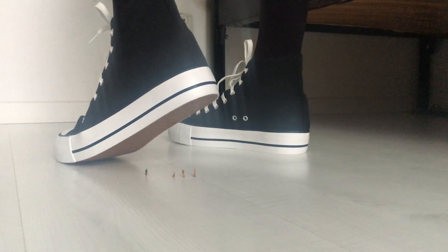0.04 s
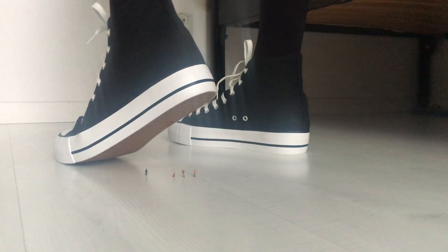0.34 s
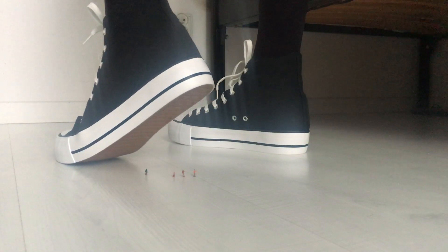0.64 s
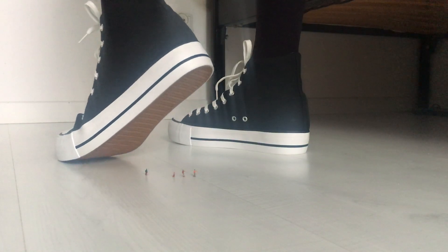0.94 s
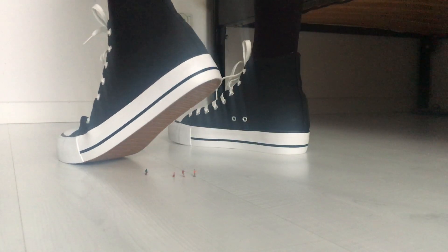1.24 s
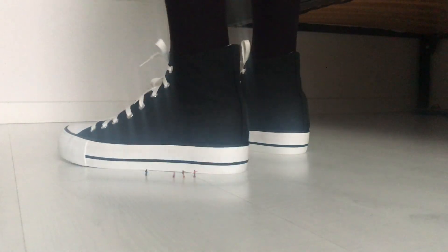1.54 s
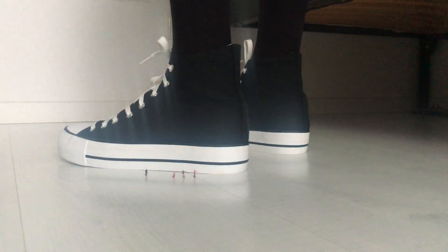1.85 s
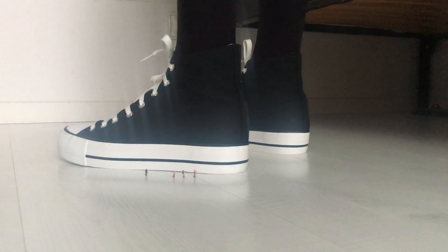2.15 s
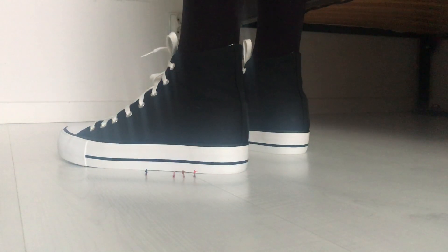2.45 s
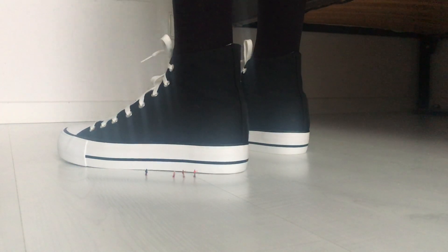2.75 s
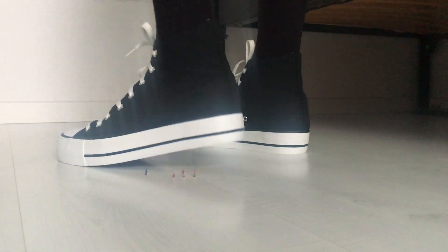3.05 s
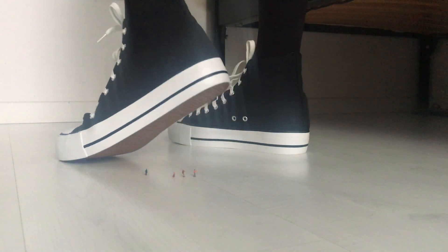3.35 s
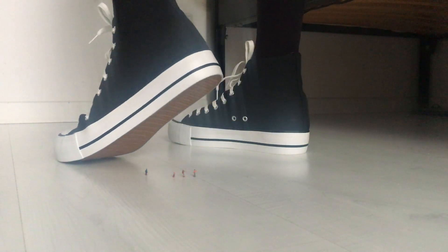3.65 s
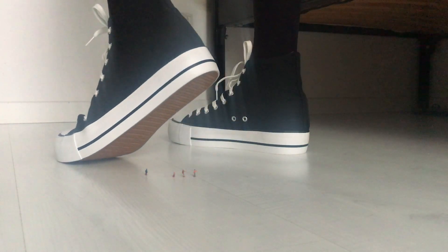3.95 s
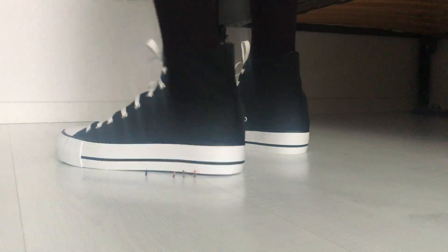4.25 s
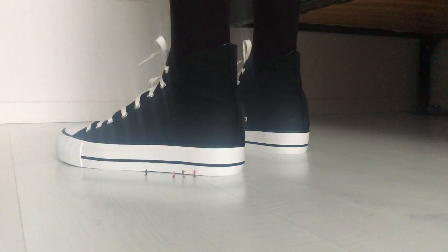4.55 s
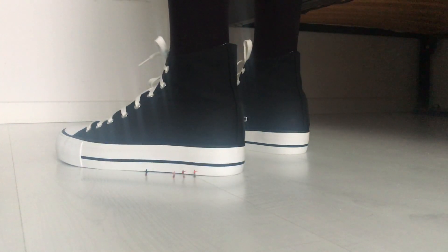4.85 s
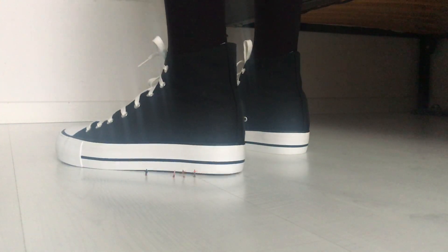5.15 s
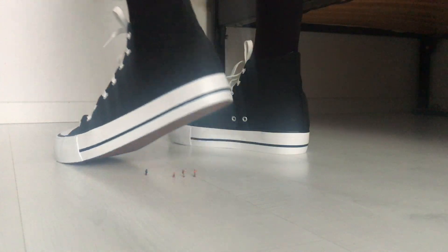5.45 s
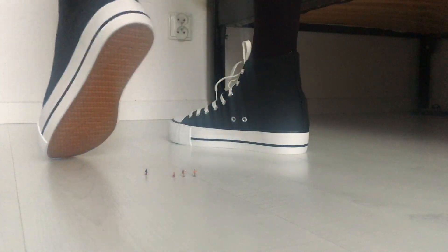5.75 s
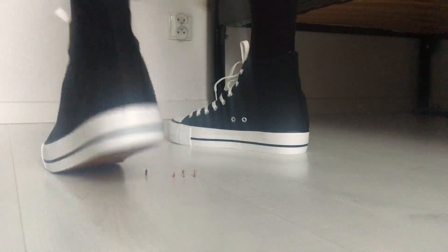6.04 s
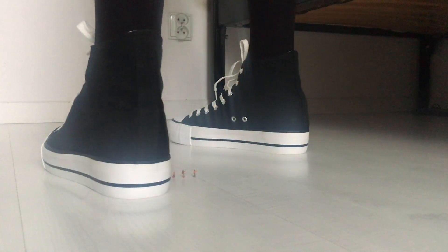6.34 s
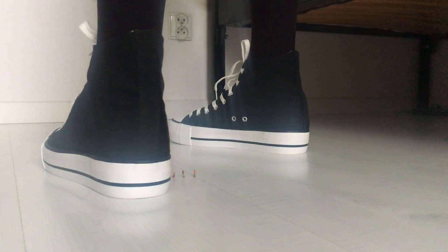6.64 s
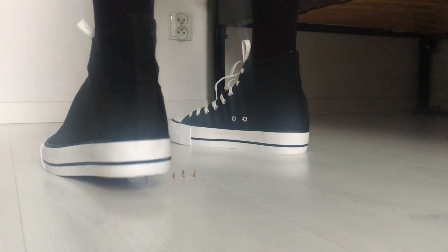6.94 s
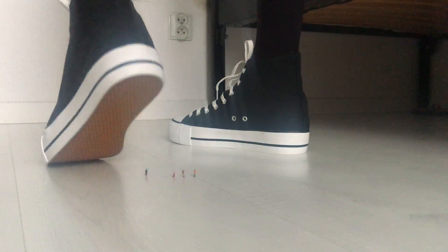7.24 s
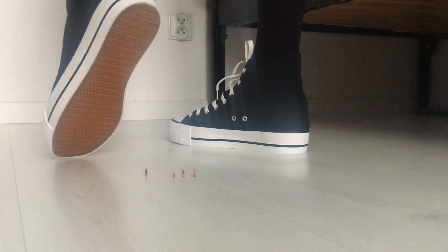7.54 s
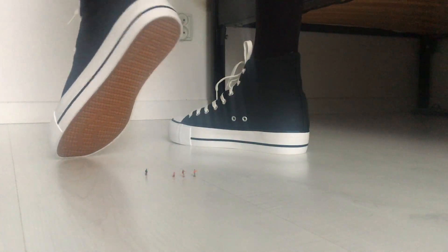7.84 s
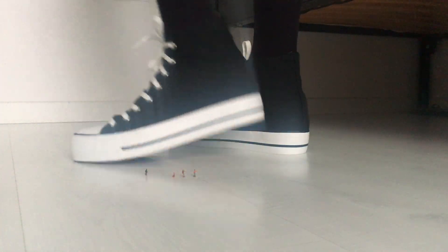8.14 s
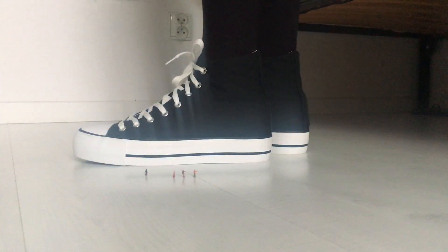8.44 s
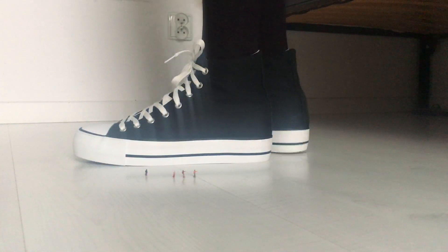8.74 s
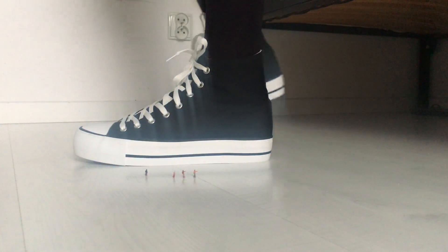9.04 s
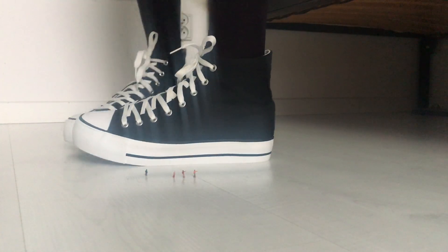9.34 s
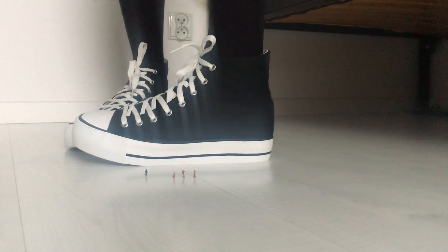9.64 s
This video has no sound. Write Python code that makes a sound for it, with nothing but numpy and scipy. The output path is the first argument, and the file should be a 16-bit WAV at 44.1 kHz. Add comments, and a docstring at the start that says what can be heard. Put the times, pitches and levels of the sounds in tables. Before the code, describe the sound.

Rubber-soled sneakers step slowly on a laminate floor in a small, quiet room. Four hollow, bassy heel thuds land a couple of seconds apart, each with a slight crackle of tread. Between them come soft bumps of shifting weight, small ticks as the sole peels away, and very faint scuffs. A few light toe touches finish it. The shoes sound close, over a faint rumble and hiss.

```python
"""Four hollow footfalls, with soft bumps, ticks and scuffs between: sneakers on a floating laminate floor.
Each impact launches a dispersive bending wave in the boards, excites the floor's damped modes
and reverberates in a small, quiet room. The rubber soles tick and scuff by stick-slip friction
as they flex and peel away. A faint rumble and hiss lie under it all."""
import sys
import numpy as np
from scipy import signal
from scipy.fft import rfft, irfft
from scipy.io import wavfile

SR = 44100
rng = np.random.default_rng(int(sys.argv[2]) if len(sys.argv) > 2 else 0)


def digitize_waveform(pressure):
    """Quantize a signal to 16-bit integers and store it at the path in sys.argv[1].

    Rows of a 2-D input are taken as channels; values are limited to [-1, 1].
    """
    field = np.atleast_2d(pressure).T
    bounded = np.clip(field, -1, 1)
    quanta = np.round(bounded * 32767).astype(np.int16)
    wavfile.write(sys.argv[1], SR, quanta)


N = 427329
SIZE = 32768   # samples in one event
AGE = np.arange(SIZE) / SR   # seconds since its onset
HZ = np.maximum(np.arange(SIZE // 2 + 1) * SR / SIZE, 1)   # frequencies of its spectrum
BASS_BAND_HZ, KNOCK_BAND_HZ, CLACK_BAND_HZ = [17, 92], [145, 283], [1200, 1800]


def from_db(db):
    """Amplitude ratio of a level in decibels."""
    return 10 ** (np.asarray(db) / 20)

def rms_one(x):
    """Normalisation to unit rms."""
    return x / np.sqrt(np.mean(x ** 2) + 1e-20)

def at_hz(rows, hz, column=1):
    """Interpolation of a table column over log frequency."""
    rows = np.array(rows)
    return np.interp(np.log(hz), np.log(rows[:, 0]), rows[:, column])

def band(x, hz, kind, order=2):
    """Butterworth filter."""
    sections = signal.butter(order, np.clip(hz, 10, .45 * SR), kind, fs=SR, output="sos")
    return signal.sosfilt(sections, x + 1e-18)

def emphasis(x, db, band_hz):
    """Boost or cut of one broad band."""
    return x + (from_db(db) - 1) * band(x, band_hz, "band", order=1)

def add(track, start_s, sound):
    """Superposition of a sound on a track."""
    start = int(round(start_s * SR))
    track[start:start + len(sound)] += sound[:len(track) - start]

def ring(hz, db, t60_s):
    """Free vibration of a damped oscillator."""
    return from_db(db - 60 * AGE / t60_s) * np.sin(2 * np.pi * hz * AGE)


# The heel lands flat: start_s, level_db, bass_db, knock_db, clack_db, crackle_db, crackle_hz
HEEL_IMPACTS = [(1.5543, -19, 3.5, -2, 1, -5.5, 2160), (4.2954, -18, -6, 0, 1.5, -5.5, 2000),
                (6.1544, -18.5, -0.5, 1.5, 0, -2, 2470), (8.272, -20.5, 0.5, -5.5, -14.5, -4, 3000)]

def heel_strikes():
    """Impact excitation: a hard contact drives a wide band; each step colours the same blow anew."""
    out = np.zeros(N)
    blow = thud(hardness_hz=5240, pitch_ratio=1.017)
    for start_s, level_db, bass_db, knock_db, clack_db, crackle_db, crackle_hz in HEEL_IMPACTS:
        tread = from_db(crackle_db) * crackle(crackle_hz)
        step = emphasis(blow + tread, clack_db, CLACK_BAND_HZ)
        add(out, start_s, from_db(level_db) * landing(step, bass_db, knock_db))
    return out

def thud(hardness_hz, pitch_ratio):
    """Contact time limits bandwidth: a softer blow draws only the lows from the floor's response."""
    response = with_echoes(bending_wave(pitch_ratio)) + floor_ring()
    return band(response, hardness_hz, "low", order=4)

def landing(step, bass_db, knock_db):
    """Coupling: where and how flat the sole lands sets the bass weight and the hollow knock."""
    weighted = emphasis(step, bass_db, BASS_BAND_HZ)
    return emphasis(weighted, knock_db, KNOCK_BAND_HZ)

def crackle(pitch_hz, level_db=-33, peak_s=0.0044, fizz_db=-15, edge_ratio=1.8):
    """Friction noise: the tread crackles as it flattens, and a little fizz escapes undamped."""
    envelope = AGE / peak_s * np.exp(1 - AGE / peak_s)
    edges_hz = [pitch_hz / edge_ratio, pitch_hz * edge_ratio]
    grain, fizz = band(rng.standard_normal((2, SIZE)), edges_hz, "band", order=1)
    noise = rubber_damping(grain, top_hz=4600) + from_db(fizz_db) * fizz
    return from_db(level_db) * envelope * rms_one(noise)


# Spectrum of the boards' bending wave: frequency_hz, level_db
BOARD_SPECTRUM = [(30, -17.5), (90, 3), (140, -7.5), (195, 2), (245, 3.5), (335, -8.5), (410, -0.5),
                  (640, -3.5), (770, -14.5), (1350, -20.5), (1600, -29.5), (2250, -24.5), (2900, -37),
                  (3900, -36), (12000, -100)]

def bending_wave(pitch_ratio, travel_s=0.003343, reference_hz=250, fastest_hz=3000):
    """Dispersion: wave speed grows as the root of frequency, so the pulse arrives treble first."""
    magnitude = from_db(at_hz(BOARD_SPECTRUM, HZ / pitch_ratio))
    cepstrum = irfft(np.log(magnitude))
    spectrum = np.exp(rfft(2 * cepstrum * (np.arange(SIZE) < SIZE // 2)))   # minimum phase: causal
    delay_s = travel_s * np.maximum(np.sqrt(reference_hz / HZ) - np.sqrt(reference_hz / fastest_hz), 0)
    phase_lag = 2 * np.pi * np.cumsum(delay_s) * SR / SIZE
    wave = irfft(spectrum * np.exp(-1j * phase_lag))
    return wave / np.abs(wave).max()


# Returns from the walls and the floor's edges: delay_s, reflection_factor
EARLY_REFLECTIONS = [(.0045, 0.16), (.0076, 0.21), (0.014, -0.21), (0.0197, 0.19), (0.0246, -0.16),
                     (0.0293, .24), (.0386, -0.11), (.046, 0.17)]

def with_echoes(wave, echo_cut_hz=850):
    """Reflection at boundaries: dull, delayed copies follow the direct wave."""
    out = wave.copy()
    dull = band(wave, echo_cut_hz, "low")
    for delay_s, reflection_factor in EARLY_REFLECTIONS:
        add(out, delay_s, reflection_factor * dull)
    return out


# Modes of the floor on its underlay: pitch_hz, level_db, t60_s
FLOOR_RESONANCES = [(48, -33, 0.11), (79, -6.5, 0.12), (110, -34, 0.47), (150.5, -17.5, 0.18),
                    (213, -25, 0.19), (253, -24, 0.11), (279.8, -18, 0.23), (314.8, -12, 0.15),
                    (391, -30, 0.37), (510, -52, 0.16), (554, -31, 0.45), (634, -33, 0.37),
                    (686, -38.5, 0.59), (895, -24.5, 0.13), (966, -42.5, 0.4)]

def floor_ring(build_up_s=0.015):
    """Standing waves: the modes build up as the wave spreads and returns."""
    modes = sum(ring(*mode) for mode in FLOOR_RESONANCES)
    return modes * (1 - np.exp(-AGE / build_up_s))


# The toe touches down: start_s, level_db, hardness_hz, knock_db
TOE_IMPACTS = [(2.8463, -58, 1700, 3), (4.18, -49, 1590, -7), (8.192, -39, 750, -13),
               (8.755, -41.5, 2100, -0.5), (9.56, -38, 520, -2), (9.575, -37, 465, 5.5),
               (9.613, -35.5, 799, 4)]

def toe_touches(crackle_db_per_octave=11.5):
    """Contact stiffness: the harder a light touch, the brighter its thud and the louder its crackle."""
    out = np.zeros(N)
    for start_s, level_db, hardness_hz, knock_db in TOE_IMPACTS:
        crackle_db = 6 + crackle_db_per_octave * np.log2(hardness_hz / 1000)
        tread = from_db(crackle_db) * crackle(pitch_hz=1030, peak_s=0.006)
        step = thud(hardness_hz, pitch_ratio=0.7) + tread   # a deeper-sounding spot
        add(out, start_s, from_db(level_db) * landing(step, bass_db=6.5, knock_db=knock_db))
    return out


# Body weight rolls onto or off the sole: start_s, level_db
LOAD_CHANGES = [(1.432, -43.5), (4.239, -36), (4.487, -35.5), (5.197, -39.5), (6.076, -37.5), (6.361, -44),
                (8.204, -40), (8.225, -38)]

def weight_shifts():
    """Compliance: under a slow push the floor sinks on its underlay with a dull bump."""
    out = np.zeros(N)
    bump = emphasis(thud(hardness_hz=142, pitch_ratio=0.99), db=3, band_hz=BASS_BAND_HZ)
    for start_s, level_db in LOAD_CHANGES:
        add(out, start_s, from_db(level_db) * bump)
    return out


# The tread snaps free of the floor: start_s, level_db, pitch_hz, high_cut_hz
TREAD_RELEASES = [(0.8509, -49, 2180, 8000), (2.8472, -52, 1800, 5000), (3.021, -60, 2160, 3000),
                  (3.078, -56, 1950, 3000), (4.1783, -50.5, 2150, 8000), (5.341, -49.5, 2020, 2800),
                  (5.377, -53, 1730, 2800), (5.4166, -55, 1450, 3500), (5.535, -55, 2400, 8000),
                  (6.956, -56, 2400, 5000), (7.0557, -54.5, 1840, 3000), (7.3021, -41.5, 2220, 6000)]
# Modes of the tread: pitch_ratio, level_db, t60_s
RUBBER_MODES = [(1, 0, 0.0052), (1.42, -3.5, 0.0037), (1.9, 0.5, 0.0014)]

def ticks(grit=0.12, grit_t60_s=0.013, low_cut_hz=1100, reslip_s=0.0075, reslip_db=-9.5):
    """Elastic release: a gritty snap rings the damped rubber, which catches and lets go once more."""
    out = np.zeros(N)
    for start_s, level_db, pitch_hz, high_cut_hz in TREAD_RELEASES:
        rubber = sum((-1) ** k * ring(pitch_hz * ratio, mode_db, t60_s)
                     for k, (ratio, mode_db, t60_s) in enumerate(RUBBER_MODES))
        for snap_s, snap_db in [(start_s, level_db), (start_s + reslip_s, level_db + reslip_db)]:
            small_slips = grit * rng.standard_normal(SIZE) * from_db(-60 * AGE / grit_t60_s)
            snap = (AGE == 0) + small_slips
            ringing = signal.fftconvolve(snap, rubber)[:SIZE]
            tick = band(ringing, [low_cut_hz, high_cut_hz], "band", order=1)
            add(out, snap_s, from_db(snap_db) * tick / np.abs(tick).max())
    return out


# Rubber and canvas rub: middle_s, half_length_s, level_db, pitch_hz
SHOE_RUBS = [(2.873, 0.019, -77, 1470), (3.067, 0.072, -85, 2080), (5.188, 0.016, -71.5, 2470),
             (5.361, 0.16, -79, 1650), (6.049, 0.059, -71, 2200), (7.098, 0.026, -78, 1600),
             (8.197, 0.012, -63.5, 1930), (8.756, 0.011, -61.5, 2800), (9.182, .045, -72.5, 2400)]

def scuffs(slips_per_s=1500, edge_ratio=1.47):
    """Stick-slip friction: dense random slips swell and fade as the shoe shifts."""
    out = np.zeros(N)
    for middle_s, half_length_s, level_db, pitch_hz in SHOE_RUBS:
        slips = rng.standard_normal(SIZE) * (rng.random(SIZE) < slips_per_s / SR)
        rub = rms_one(band(slips, [pitch_hz / edge_ratio, pitch_hz * edge_ratio], "band"))
        swell = np.exp(-((AGE - AGE.mean()) / half_length_s) ** 2)
        add(out, middle_s - AGE.mean(), from_db(level_db) * rub * swell)
    return out

def rubber_damping(x, top_hz=5600):
    """Internal damping: soft rubber gives off almost no high treble."""
    return band(x, top_hz, "low", order=3)


# The room's diffuse field against the direct sound: frequency_hz, level_db, t60_s
ROOM_DECAY = [(60.8, -25.5, 0.7), (150, -15.5, 0.35), (414, -14, 0.48), (750, -14, 0.33), (1200, -8, 0.32),
              (2400, -8.5, 0.32), (5000, -11.5, 0.55), (12000, -10, .12)]

def reverberation(x, first_wall_s=0.005, build_up_s=0.0012):
    """Diffuse reflection: each half octave dies away exponentially at its own rate."""
    tail = np.zeros(SIZE)
    edges_hz = 45 * np.sqrt(2) ** np.arange(18)
    onset = 1 - np.exp(-np.maximum(AGE - first_wall_s, 0) / build_up_s)
    for low, high in zip(edges_hz, edges_hz[1:]):
        centre_hz = np.sqrt(low * high)
        decay = from_db(-60 * AGE / at_hz(ROOM_DECAY, centre_hz, column=2))
        reflections = band(rng.standard_normal(SIZE) * onset * decay, [low, high], "band")
        unity_gain_rms = np.sqrt(2 * (high - low) / SR / SIZE)
        tail += from_db(at_hz(ROOM_DECAY, centre_hz)) * rms_one(reflections) * unity_gain_rms
    return signal.fftconvolve(x, tail)[:N]


# Spectrum of the background: frequency_hz, relative_density_db
NOISE_SPECTRUM = [(12, -51), (20, -23), (30, -9), (54, 2), (70, -2), (87, -8), (126, -5.5), (153, -10),
                  (352, -13.5), (549, -19), (1230, -24.5), (2090, -26.5), (4950, -33.5), (9660, -37),
                  (15500, -42)]

def ambience(level_db=-67):
    """Stationary noise: the rumble of the house and microphone hiss."""
    white = rfft(rng.standard_normal(N))
    hz = np.maximum(np.arange(len(white)) * SR / N, 1)
    noise = irfft(white * from_db(at_hz(NOISE_SPECTRUM, hz)), N)
    return from_db(level_db) * rms_one(noise)


def scene():
    """Superposition: the nearby shoes, their reverberation and the background, in mono."""
    shoes = heel_strikes() + toe_touches() + weight_shifts() + rubber_damping(ticks() + scuffs())
    return (shoes + reverberation(shoes) + ambience())[None]

def record(dry, port_notch_hz=10400, notch_q=12, notch_depth=0.29, low_cut_hz=27, high_cut_hz=15700):
    """Frequency response: the microphone port dents the treble; the deep bass and the top are cut."""
    notched = signal.lfilter(*signal.iirnotch(port_notch_hz, notch_q, fs=SR), dry)
    coloured = band(dry + notch_depth * (notched - dry), low_cut_hz, "high")
    steep_low_pass = signal.ellip(12, .1, 70, high_cut_hz, fs=SR, output="sos")
    return signal.sosfilt(steep_low_pass, coloured)


dry = scene()
out = record(dry)
digitize_waveform(out)
```